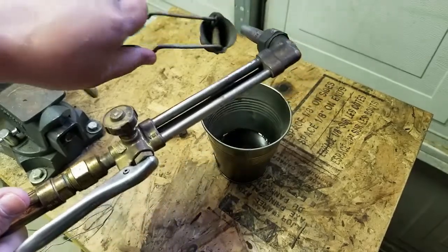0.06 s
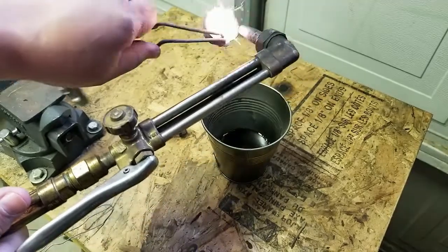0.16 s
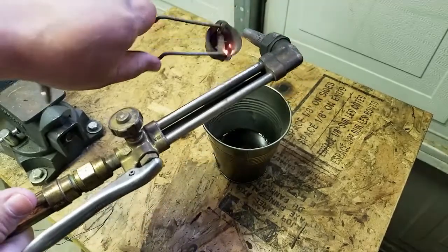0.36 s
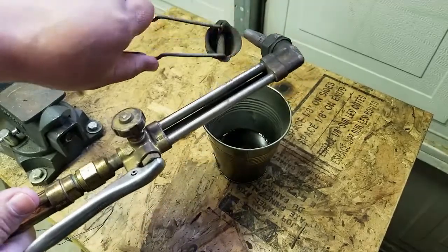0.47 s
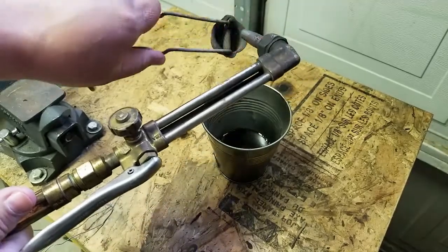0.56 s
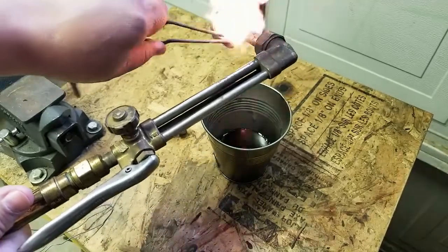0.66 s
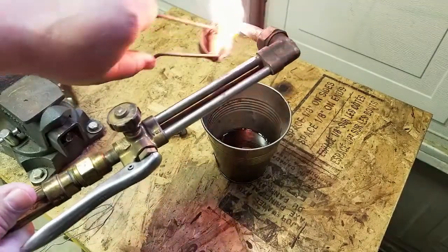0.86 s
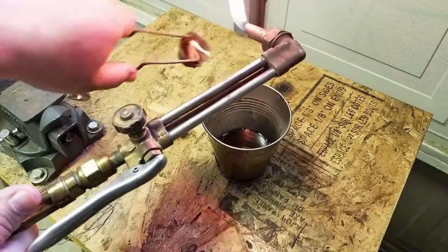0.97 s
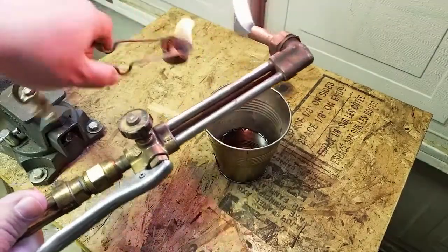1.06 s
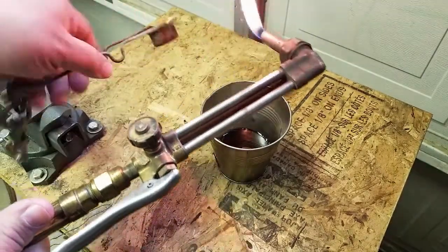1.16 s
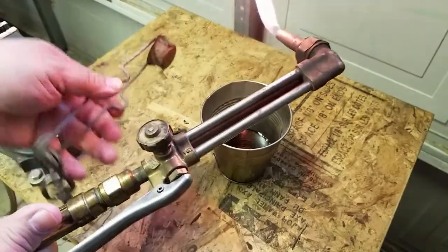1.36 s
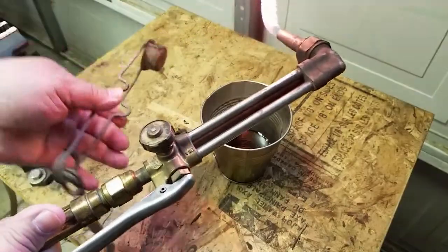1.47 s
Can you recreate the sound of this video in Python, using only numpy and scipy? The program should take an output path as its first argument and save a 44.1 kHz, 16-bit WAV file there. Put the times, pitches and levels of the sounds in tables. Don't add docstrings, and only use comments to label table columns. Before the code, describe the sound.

A flint striker is squeezed twice, rasping metallic scrapes and clicks, with a soft low ignition puff

```python
import sys
import numpy as np
from scipy import signal
from scipy.fft import rfft, irfft
from scipy.io import wavfile
from scipy.ndimage import uniform_filter1d

SR = 44100
rng = np.random.default_rng(int(sys.argv[2]) if len(sys.argv) > 2 else 0)


def file_out(sig):
    cols = np.atleast_2d(sig).T
    lim = np.clip(cols, -1, 1)
    pcm = np.round(lim * 32767).astype(np.int16)
    wavfile.write(sys.argv[1], SR, pcm)


def gain_from_db(level_db):
    decades = np.asarray(level_db, float) / 20
    return 10 ** decades


N = 66150


def evened(x):
    return x / np.sqrt(np.mean(x ** 2) + 1e-20)


def read(points, hz):
    f, value = np.transpose(points)
    return np.interp(np.log(hz + 1), np.log(f + 1), value)


def curve(rows):
    s, *cols = np.transpose(rows)
    return [np.interp(np.arange(N) / SR, s, c) for c in cols]


def colour(x, gain):
    return irfft(rfft(x) * gain(np.fft.rfftfreq(N, 1 / SR)), N)


def ring(x, modes):
    t = np.arange(2048) / SR
    body = np.zeros(2048)
    for k, (hz, width_hz, db) in enumerate(modes):
        decay = np.sqrt(width_hz) * np.exp(-np.pi * width_hz * t)
        body += gain_from_db(db) * decay * np.sin(2 * np.pi * hz * t + k * k)
    return signal.oaconvolve(x, body / np.linalg.norm(body))[:N]


def background():
    # (frequency [Hz], correlation [0-1])
    likeness = [(60, 1), (240, 0.9), (950, 0.068), (15000, 0.1)]
    # (frequency [Hz], density [dB per Hz])
    rumble_tone = [(12, -45), (20, -25), (64, -2.5), (298, -26.5), (339, -28.5), (413, -36.5), (592, -34),
                   (1000, -35), (1300, -65.5), (2200, -120)]
    # (frequency [Hz], density [dB per Hz])
    hiss_tone = [(350, -32), (740, -10), (1200, -13.5), (1900, -13), (2700, -11), (5900, -4), (8500, -18.5),
                 (15500, -17.5)]
    # (frequency [Hz], width [Hz], level [dB])
    whistles = [(9810, 320, -77), (2653, 120, -80.5), (1455, 32, -84.5), (4700, 120, -94.5)]
    # (time [s], rumble level [dB], hiss level [dB])
    auto_gain = [(0, 2, 4), (.15, 2.5, 1.5), (.4, -1.5, -12), (.6, -7.5, -5.5), (.85, -4.5, -0.5),
                 (1.1, -13, -5.5), (1.3, -5, -1.5), (1.5, -9, -3)]
    rumble_level_db, hiss_level_db = -55.5, -68.5

    left, other = rng.standard_normal((2, N))
    shared = colour(left, lambda hz: read(likeness, hz))
    own = colour(other, lambda hz: np.sqrt(1 - read(likeness, hz) ** 2))
    pair = np.array([left, shared + own])

    rumble = evened(colour(pair, lambda hz: gain_from_db(read(rumble_tone, hz) - hz / 300)))
    hiss = evened(colour(pair, lambda hz: gain_from_db(read(hiss_tone, hz)) * hz ** 2 / (hz ** 2 + 500 ** 2)))
    hiss = gain_from_db(hiss_level_db) * hiss
    for centre_hz, width_hz, db in whistles:
        whistle = colour(pair, lambda hz: 1 / (1 + (2 * (hz - centre_hz) / width_hz) ** 2))
        hiss = hiss + gain_from_db(db) * evened(whistle)
    rumble_db, hiss_db = curve(auto_gain)
    return gain_from_db(rumble_level_db + rumble_db) * rumble + gain_from_db(hiss_db) * hiss


def room(x):
    # (frequency [Hz], time to fall 60 dB [s])
    decay_times = [(300, 1), (1000, 0.29), (3000, 0.28), (8000, 0.27), (12500, 0.22), (16000, 0.17)]
    length, gap = SR // 2, 20
    starts = np.arange(120, length - gap, gap)
    at = starts + rng.integers(0, gap, (2, len(starts)))
    taps = np.zeros((2, length))
    np.put_along_axis(taps, at, rng.choice([-1., 1.], at.shape), 1)
    difference = np.pad(taps[::-1] - taps, ((0, 0), (0, N - length)))
    taps = taps + colour(difference, lambda hz: .5 / (1 + (hz / 900) ** 2))[:, :length]
    hz, t, z = signal.stft(taps, SR, nperseg=256)
    fall = gain_from_db(-60 * t / read(decay_times, hz)[:, None])
    tail = signal.istft(z * fall, SR, nperseg=256)[1]
    return signal.fftconvolve(x[None], tail / np.linalg.norm(tail[0]), axes=1)[:, :N]


def ports(x, bench_db):
    # (frequency [Hz], left minus right [dB])
    lean = [(60, 0.5), (150, .5), (380, 0), (950, -1), (2380, 1), (4500, 3), (8000, 4), (15000, -0.5)]
    # (frequency [Hz], left lead [rad])
    lead = [(100, .05), (1000, 0.18), (5000, 2.02), (8000, 1.9), (12500, 2.2), (16000, 0.83)]
    bench_t60_s, wall_s, wall_db = .045, .0099, -17
    side, t = np.array([[.5], [-.5]]), np.arange(3000) / SR

    clutter = rng.standard_normal((2, 3000)) * (rng.random((2, 3000)) < .1)
    clutter = clutter * (t > .0006) * gain_from_db(-60 * t / bench_t60_s)
    echoes = gain_from_db(bench_db) * clutter / np.linalg.norm(clutter, axis=1, keepdims=True)
    echoes[:, round(wall_s * SR)] += gain_from_db(wall_db)

    direct = colour(x, lambda hz: np.exp(1j * side * read(lead, hz)))
    near = direct + signal.fftconvolve(x[None], echoes, axes=1)[:, :N]
    return colour(near, lambda hz: gain_from_db(side * read(lean, hz)))


def puff():
    # (time [s], level [dB])
    swell = [
        (.69, -78),
        (.712, -50),
        (.74, -40.5),
        (.757, -45.5),
        (.768, -55),
        (.82, -62),
        (.84, -73),
    ]
    # (frequency [Hz], density [dB per Hz])
    flutter_tone = [(18, -24), (50, -6), (95, -8), (130, 2), (170, -10), (250, -6), (600, -15), (1200, -23),
                    (2600, -87)]
    t = np.arange(N) / SR
    burning = (t > swell[0][0]) * (t < swell[-1][0])
    noise = rng.standard_normal(N)
    flutter = evened(colour(noise, lambda hz: gain_from_db(read(flutter_tone, hz) - hz / 200)))
    spread = gain_from_db(-10) * colour(flutter[::-1], lambda hz: hz ** 2 / (hz ** 2 + 250 ** 2))
    return burning * gain_from_db(curve(swell)[0]) * np.array([flutter + spread, flutter - spread])


def struck_rings(rows, tick_s):
    wobble_rad, wobble_s = .9, .0015
    out, t = np.zeros(N + 3000), np.arange(3000) / SR
    noise = rng.standard_normal((len(rows), 3000))
    ticks = signal.lfilter([1, -2, 1], [1, -.9, .3], noise)
    ticks = ticks * np.exp(-t / tick_s) * np.minimum(t / .0005, 1)
    span = round(wobble_s * SR)
    drift = noise
    wobbles = wobble_rad * evened(uniform_filter1d(uniform_filter1d(drift, span), span))
    for (s, db, hz, cycles, tick_db), tick, wobble in zip(rows, ticks, wobbles):
        u = t * hz / cycles * 3
        swell_and_fall = (np.e * u * np.exp(-u)) ** 2
        tone = swell_and_fall * np.sin(2 * np.pi * hz * t + wobble)
        out[round(s * SR):][:3000] += gain_from_db(db) * (tone + gain_from_db(tick_db) * tick / 2)
    return out[:N]


def handle_rattle():
    # (time [s], peak [dB], ringing [Hz], length [cycles], tick over ring [dB])
    wire_ticks = [(1.045, -59.5, 8270, 44, 14.5), (1.049, -66, 11910, 230, 6.5), (1.159, -71, 5650, 25, 14),
                  (1.206, -62, 4750, 43, 3), (1.231, -49, 5120, 10, 1), (1.239, -44, 14200, 25, 11),
                  (1.2421, -35, 4130, 7.3, -2.5), (1.243, -47.5, 8100, 65, -5), (1.252, -53, 12800, 80, -7),
                  (1.254, -45.5, 8320, 34, -1), (1.271, -57, 4520, 17, -3), (1.294, -46, 5760, 12, 5),
                  (1.2945, -45, 12000, 90, 2), (1.295, -52, 3930, 13, -1), (1.3165, -56, 13300, 68, 0)]
    return struck_rings(wire_ticks, tick_s=.003)


def flint_catches():
    # (time [s], peak [dB], ringing [Hz], length [cycles], tick over ring [dB])
    tooth_catches = [(.1758, -30.5, 7300, 18, -13), (.176, -35, 3350, 7.3, -25),
                     (.2018, -16.5, 3210, 18.7, -26), (.2112, -41, 3170, 16, -16),
                     (.219, -28, 3600, 6.8, -1), (.2255, -30.5, 2980, 15, -11), (.242, -31.5, 7900, 90, -6),
                     (.2505, -20.5, 8000, 25, -15), (.262, -31, 7900, 68, -16.5),
                     (.3545, -18.5, 3182, 24, -10.5), (.361, -22.5, 3276, 23, -9.5),
                     (.3652, -14.5, 3340, 7.8, -6.5), (.3678, -21.5, 2830, 5.6, -3.5),
                     (.3697, -9, 7990, 20, -19), (.379, -30, 7900, 22, -10.5),
                     (.3715, -19.5, 6710, 34, -11), (.208, -37.5, 959, 15.4, -23),
                     (.363, -21.5, 13500, 130, -16.5), (.369, -20, 12300, 55, -13.5),
                     (.653, -51, 4200, 36, -5), (.665, -47.5, 3160, 23, -15.5),
                     (.6772, -32, 3190, 8.7, -8.5), (.6812, -29, 3150, 12.4, -7),
                     (.6865, -35, 2900, 6.4, -11), (.6945, -44, 3180, 14, -9),
                     (.7038, -28.5, 3070, 13.5, -20.5), (.7065, -27, 7180, 29, -15.5),
                     (.7275, -25.5, 7490, 24, -9.5), (.7298, -13.5, 7050, 10.4, -16),
                     (.7328, -40, 7200, 15, -25.5), (.739, -42, 6400, 8.6, -10),
                     (.731, -37, 12970, 90, -17), (.8383, -42, 14600, 33, -9), (.8492, -23, 7200, 17, -6.5),
                     (.8505, -23, 3160, 3.3, -16), (.851, -30, 12760, 130, -11), (.8554, -23, 8200, 14, 12),
                     (.8558, -40, 12900, 40, -17)]
    return struck_rings(tooth_catches, tick_s=.0005)


def scrape():
    # (time [s], force [dB], cup belly over rim [dB])
    strokes = [
        [(.155, -59, -1), (.175, -47, 31), (.197, -34.5, -2), (.203, -29, 2), (.215, -28.5, -11),
         (.24, -36, 30), (.25, -34.5, -9), (.268, -38.5, 14), (.292, -47.5, 0)],
        [(.325, -50, 3.5), (.349, -46.5, -4.5), (.356, -26.5, 27.5), (.367, -26, 2), (.372, -32, -8.5),
         (.376, -52.5, -2), (.388, -28.5, -16)],
        [(.64, -82.5, 7), (.672, -47.5, 3), (.682, -45, -10), (.701, -45, 5), (.708, -36.5, -12),
         (.724, -49.5, -1), (.731, -32.5, -15), (.745, -56, -18), (.765, -51, 0)],
        [(.815, -68, 42), (.83, -44.5, 22), (.848, -37, 1), (.857, -33.5, -2), (.865, -48, -6), (.875, -55, 10)],
        [(1.2, -87.5, 16), (1.228, -67, 0.5), (1.24, -54.5, -11.5), (1.27, -58.5, -7.5), (1.288, -64.5, 4),
         (1.32, -63.5, -8.5), (1.335, -73, 18)],
    ]
    # (grit [dB], wire [dB], handle [Hz], handle [dB], hand thud [dB])
    grips = [(0.4, -20.5, 950, -23, -26), (2, -19, 1150, -24.5, -28), (1.25, -27, 960, -18, -37),
             (3.5, -9, 1180, -16, -24), (0.5, -0.5, 2230, -34.5, -19)]
    # (frequency [Hz], density [dB per Hz])
    grit_tone = [(180, -51.5), (500, -31), (950, -18), (1500, -12), (3200, -4), (5500, -7.5), (10500, -11),
                 (13000, -3.5), (16000, -10)]
    # (frequency [Hz], width [Hz], level [dB])
    belly = [(2300, 120, -16.5), (2830, 280, 6), (3150, 270, 7.5), (3230, 23, 2.5), (3600, 200, -0.5),
             (4150, 118, -11), (4110, 50, -18.5)]
    # (frequency [Hz], width [Hz], level [dB])
    rim = [(7600, 390, -3.5), (7680, 230, 3), (7840, 67, -2.5), (7900, 110, 9), (7810, 110, -1.5),
           (8280, 310, -2)]
    # (frequency [Hz], width [Hz], level [dB])
    lip = [(12000, 250, -9.5), (12300, 300, 4.5), (13450, 210, 2.5), (13600, 220, -2)]
    # (frequency [Hz], width [Hz], level [dB])
    wire = [(1750, 250, -19), (2050, 200, -18), (3850, 250, -6), (4550, 500, -8), (5650, 400, -6),
            (12200, 500, -4), (13450, 400, -4)]
    teeth_per_s, tooth_spread_db = 6400, 3
    belly_db, rim_db, lip_db, grit_level_db = -13, -11, -20, 0.64
    handle_width_hz, thud_hz = 150, 240

    tooth_size = gain_from_db(tooth_spread_db * np.minimum(rng.exponential(1, N), 3))
    tooth_hit = rng.choice([-1., 1.], N) * (rng.random(N) < teeth_per_s / SR)
    teeth = evened(tooth_size * tooth_hit)
    grit = evened(colour(teeth, lambda hz: gain_from_db(read(grit_tone, hz))))
    thud = evened(colour(teeth, lambda hz: (hz / thud_hz) / (1 + (hz / thud_hz) ** 4)))

    out, t = np.zeros(N), np.arange(N) / SR
    for rows, (grit_db, wire_db, handle_hz, handle_db, thud_db) in zip(strokes, grips):
        force_db, tilt_db = curve(rows)
        force = (t > rows[0][0]) * (t < rows[-1][0]) * gain_from_db(force_db)
        shake = teeth * force
        out += gain_from_db(grit_level_db + grit_db) * force * grit
        out += gain_from_db(thud_db) * uniform_filter1d(force, 600) * thud
        out += gain_from_db(belly_db) * ring(shake * gain_from_db(tilt_db / 2), belly)
        out += gain_from_db(rim_db) * ring(shake * gain_from_db(-tilt_db / 2), rim)
        out += gain_from_db(lip_db) * ring(shake, lip)
        out += gain_from_db(wire_db) * ring(shake, wire)
        out += gain_from_db(handle_db) * ring(shake, [(handle_hz, handle_width_hz, 0)])
    return out


def scene():
    grind = scrape()
    ticks = flint_catches() + handle_rattle()
    near = ports(grind, bench_db=-2) + ports(ticks, bench_db=-6)
    far = room(gain_from_db(-7.5) * grind + gain_from_db(-11) * ticks)
    return near + far + puff() + background()


def top_cut(x):
    return signal.sosfilt(signal.butter(12, 16820, fs=SR, output="sos"), x)


def record(dry):
    lowpass = signal.firwin(511, 15900, window=("kaiser", 9), fs=SR)
    limited = signal.oaconvolve(dry, lowpass[None], "same")
    return top_cut(limited)


dry = scene()
out = record(dry)
file_out(out)
```